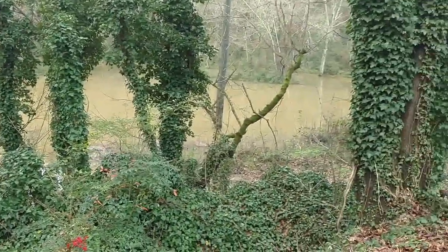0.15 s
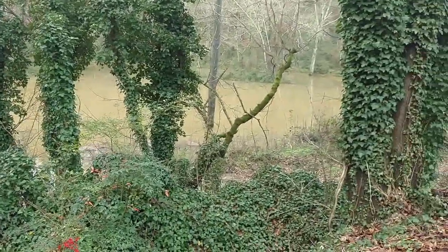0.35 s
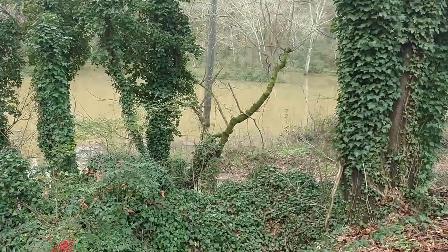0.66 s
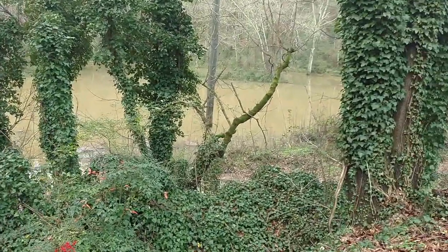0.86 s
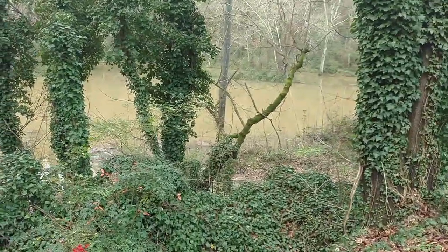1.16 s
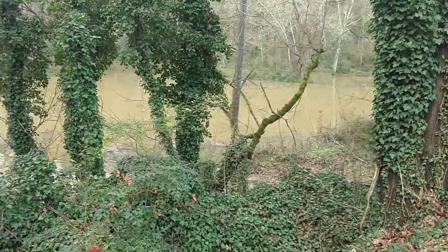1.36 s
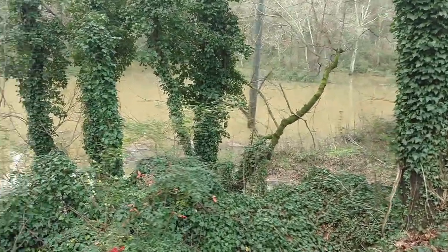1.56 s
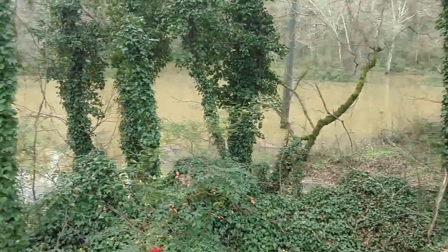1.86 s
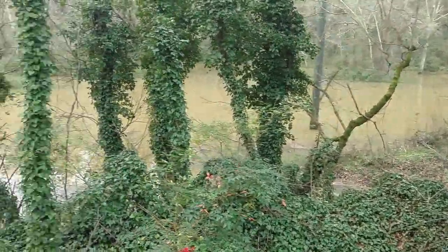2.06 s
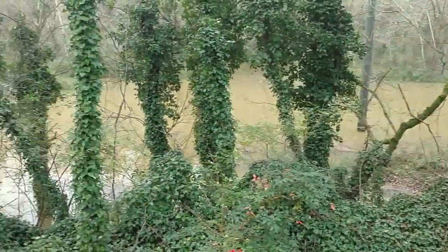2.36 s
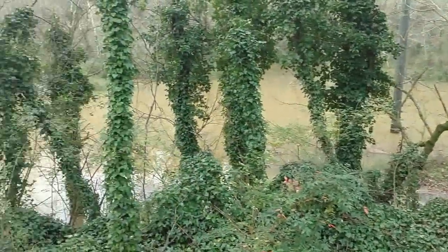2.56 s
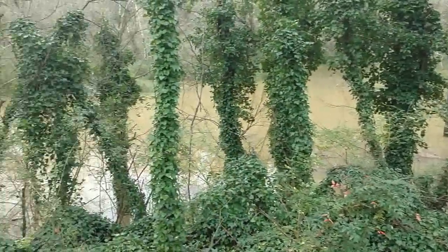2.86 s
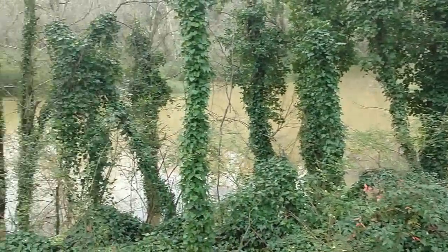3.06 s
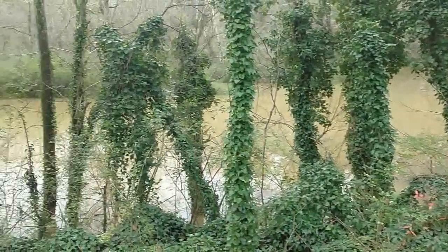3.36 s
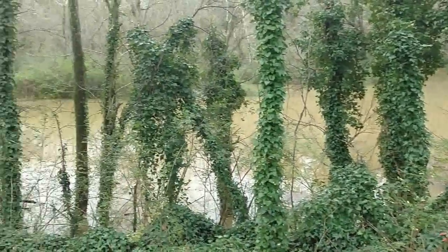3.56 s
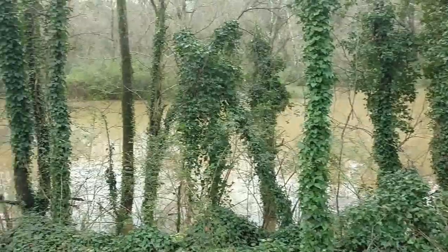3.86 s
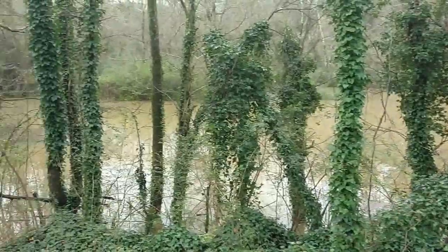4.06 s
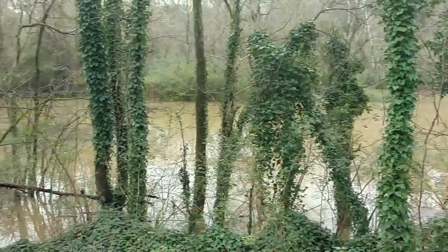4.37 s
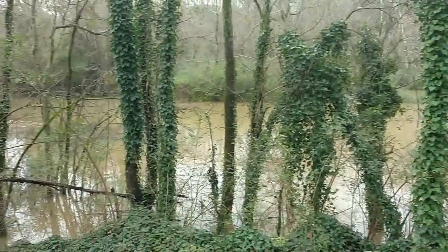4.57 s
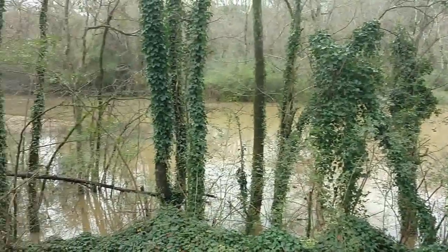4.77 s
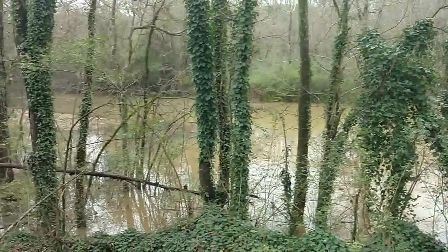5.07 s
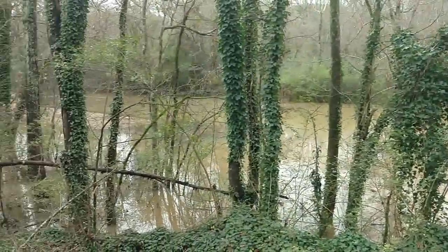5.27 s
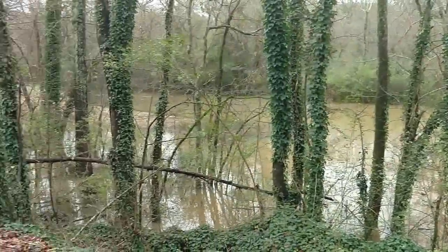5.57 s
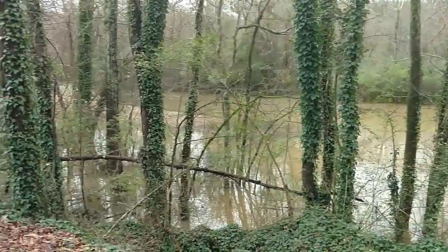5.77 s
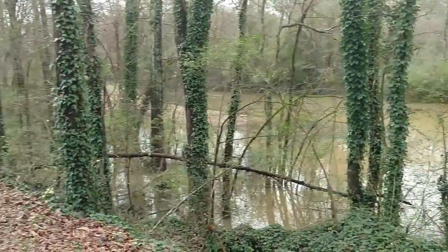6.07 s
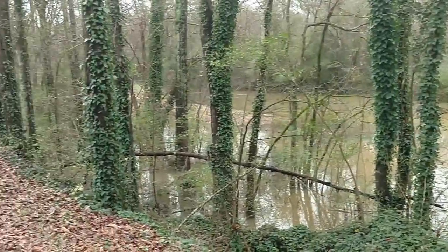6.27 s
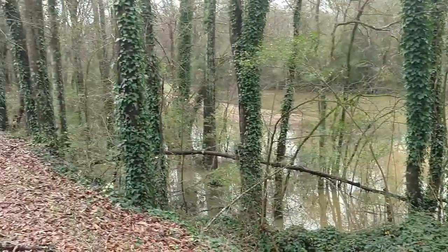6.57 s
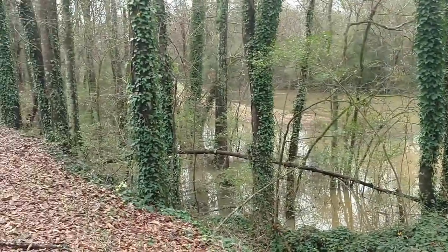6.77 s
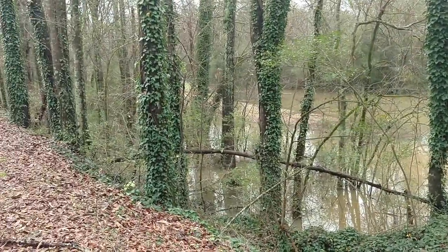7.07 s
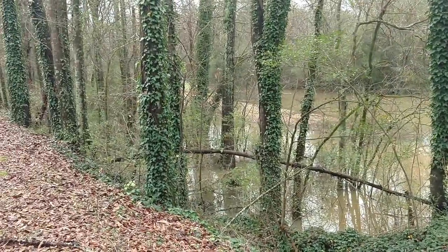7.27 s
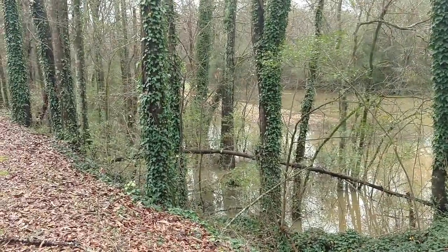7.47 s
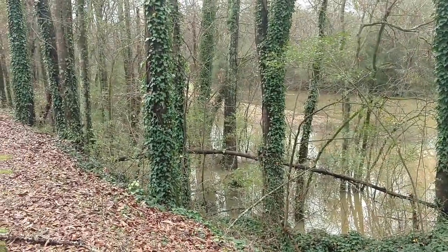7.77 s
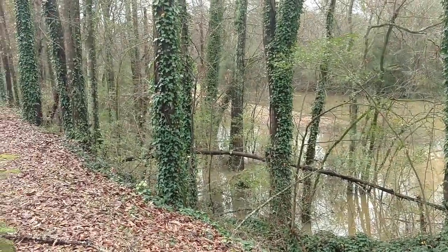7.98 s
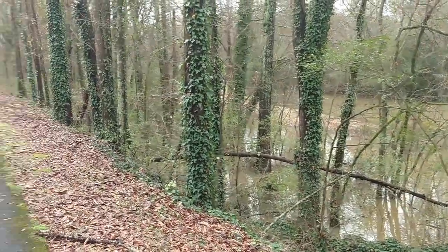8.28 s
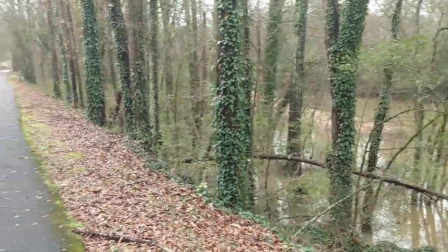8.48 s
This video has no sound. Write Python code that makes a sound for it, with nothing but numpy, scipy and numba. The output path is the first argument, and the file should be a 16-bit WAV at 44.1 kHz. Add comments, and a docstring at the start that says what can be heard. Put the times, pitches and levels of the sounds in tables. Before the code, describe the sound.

A handheld stereo microphone turns beside a wooded pond. Frogs fill the air with overlapping ratcheting trills, moderate at first, then stronger and closer, over a soft hum of far traffic. From about four seconds several raspy distant crow caws echo through the trees, a small bird whistles thinly, and soft handling clicks and a few duller bumps come very close.

```python
"""A flooded wood: chorus frogs trill, each call a slowing train of short tonal pulses that mostly rises in pitch.
Far crows caw by harmonics through throat resonances, and a small bird peeps in gliding whistles.
Distant traffic hums as filtered noise, and the hand ticks on the phone as damped tone blips.
The phone makes its stereo from two ports, each minus a delayed share of the other."""
import sys
import numpy as np
from scipy import signal
from scipy.fft import rfft, irfft, next_fast_len
from scipy.io import wavfile
from scipy.ndimage import uniform_filter1d
from numba import njit

SR = 44100
rng = np.random.default_rng(int(sys.argv[2]) if len(sys.argv) > 2 else 0)


def inscribe(sig):
    """Save sig as 16-bit PCM at rate SR to the path in sys.argv[1].

    A 1-D sig is mono; a 2-D sig holds one channel per row.
    Samples are clipped to [-1, 1] before scaling.
    """
    pcm = np.round(np.clip(np.atleast_2d(sig).T, -1, 1) * 32767)
    wavfile.write(sys.argv[1], SR, pcm.astype(np.int16))


N = 381024

# Spectra of air and far traffic at the ports: frequency_hz, shared_db_per_hz, opposed_db_per_hz
AIR_SPECTRA = [(30, -74.5, -95.5), (60.3, -70.5, -86), (109, -65, -84), (145, -66, -85), (183, -64, -83.5),
               (311, -77.5, -90), (560, -83, -93), (1100, -86.5, -88.5), (1620, -86, -79),
               (1950, -91.5, -85.5), (4900, -93, -99), (5850, -106, -104), (7350, -107, -110),
               (10100, -113, -114), (15200, -120, -121)]
# Swell of the traffic bass, used relative to its mean: time_s, level_db
TRAFFIC_SWELL = [(0.0, -53.5), (3.7, -51.5), (5.0, -49.5), (5.3, -52), (6.5, -49), (7.2, -54.5),
                 (8.64, -51.5)]
# Massed far frogs, relative levels: time_s, level_db, centre_pitch_hz, highest_voices_db
CHORUS_COURSE = [(0.0, -37, 3040, -7.5), (0.26, -40.5, 3040, -19), (1.25, -36.5, 3100, -19),
                 (1.61, -39.5, 3020, -7.5), (2.21, -37, 3050, -21.5), (2.48, -40.5, 3040, -5),
                 (2.79, -36.5, 2970, -17), (3.01, -32, 3035, -11.5), (3.2, -36, 3110, -12.5),
                 (3.46, -36.5, 2970, -20.5), (3.7, -34.5, 3100, -15.5), (4.06, -38, 2920, -8.5),
                 (4.21, -38, 3084, -11), (4.52, -35.5, 2998, -14.5), (4.88, -35.5, 3100, -11),
                 (5.22, -39, 3040, -22.5), (5.41, -34, 3100, -18.5), (5.87, -37.5, 2940, -5),
                 (6.04, -30.5, 3140, -19), (6.21, -34, 3130, -7.5), (6.47, -31, 2970, -24.5),
                 (6.74, -28, 3123, -18.5), (6.88, -36, 3115, -7), (7.12, -30.5, 2982, -22.5),
                 (7.51, -30.5, 3037, -9), (7.72, -36, 3100, -18.5), (7.92, -29.5, 3050, -22.5),
                 (8.11, -32, 3050, -13), (8.47, -30.5, 2990, -9.5), (8.64, -22.5, 3194, -31.5)]
# Partials of a frog pulse: multiple_of_pitch, level_db
FROG_PARTIALS = [(.5, -34), (1, 2), (1.5, -37), (2, -46)]
# The phone turns, shading its far port from the pond: time_s, left_port_level_db
PHONE_TURN = [(0, -2.5), (2.3, -2.5), (2.8, -3.5), (4, -2.5), (5.5, 6), (6.2, 1.5), (6.8, 0.5), (7.6, 1),
              (8.2, -2), (8.64, -1)]
# Bouts of small high frogs: start_s, length_s, first_hz, last_hz, relative_level_db
HIGH_FROG_BOUTS = [(0.0, 0.33, 3460, 3450, -43.5), (0.519, 0.47, 3280, 3790, -42.5),
                   (1.195, 0.34, 3450, 3530, -39.5), (2.199, 0.4, 3450, 3750, -43.5),
                   (4.097, 0.4, 3450, 3850, -44.5), (5.444, 0.37, 3450, 3760, -42),
                   (7.151, 0.53, 3430, 3780, -36)]
# Rhythm of the nearer frogs: start_s, pulses, first_gap_ms, gap_growth_ms_per_pulse, longest_gap_ms,
# closing_gap_ms
CALL_RHYTHMS = [(0.6585, 8.0, 33.4, 3.82, 53.1, 49.9), (2.0698, 12.0, 34.8, 2.29, 46.5, 44.9),
                (2.2912, 7.0, 37.5, 6.3, 54.6, 57.4), (2.3087, 7.0, 36.8, 2.66, 44.1, 44.5),
                (2.7279, 14.0, 33.2, 3.16, 51.5, 49.0), (2.7493, 13.0, 24.3, 2.68, 48.9, 47.8),
                (2.7677, 10.0, 44.4, 1.5, 51.2, 55.9), (3.0848, 7.0, 43.0, 1.89, 46.4, 52.4),
                (3.3943, 10.0, 26.3, 2.62, 45.4, 45.4), (3.470, 6.0, 46.0, 5.5, 57.0, 56.0),
                (3.7799, 13.0, 35.4, 1.87, 47.1, 47.4), (4.145, 7.0, 32.0, 4.09, 51.2, 53.4),
                (4.8586, 14.0, 23.8, 3.6, 48.4, 51.3), (5.2873, 8.0, 32.5, 4.19, 53.8, 61.9),
                (5.4675, 7.0, 33.0, 3.79, 41.8, 48.4), (5.7434, 11.0, 26.7, 3.45, 55.7, 54.9),
                (6.0014, 10.0, 27.1, 2.49, 44.4, 47.9), (6.0341, 5.0, 24.1, 5.05, 38.1, 36.9),
                (6.4503, 14.0, 38.1, 2.19, 57.8, 35.5), (6.6445, 6.0, 47.5, 1.0, 49.0, 49.2),
                (6.5505, 8.0, 48.3, 0.0, 48.3, 38.0), (6.6873, 6.0, 40.6, 6.15, 57.4, 55.2),
                (7.1642, 9.0, 33.3, 3.19, 55.3, 48.9), (7.3103, 12.0, 26.7, 3.61, 55.6, 40.4),
                (7.8436, 8.0, 36.4, 4.29, 55.9, 55.8), (7.9364, 12.0, 23.0, 2.59, 44.4, 37.4),
                (8.2685, 10.0, 26.4, 1.5, 34.0, 29.0), (8.4035, 5.0, 38.5, 5.0, 48.5, 51.0),
                (7.931, 6.0, 29.5, 8.0, 46.0, 60.0)]
# Row for row, their voices before scatter and limits: first_hz, last_hz, first_db, last_db,
# middle_swell_db, pulse_width_ms
CALL_VOICES = [(3100.0, 3060, -23, -31, 1.5, 5.1), (2810, 2980, -28, -26, 0.5, 7.4),
               (2920, 3070, -24, -22, 3, 4.3), (2820, 3080, -27, -25, 1.5, 4.7),
               (2880, 3120, -22, -24, 3.5, 3.7), (3420, 3640, -36, -33.5, 8.5, 2.9),
               (2900, 3220, -20, -22.5, 6.5, 2.6), (2730, 2800, -22, -24, 3, 3),
               (2840, 3280, -24.5, -24.5, 7, 3.3), (2860, 2900, -27, -31.5, 12.5, 2.6),
               (2780.0, 2990, -18.5, -21.5, 0, 2.9), (2800, 3020, -22, -18, -8, 6),
               (2970.0, 3220, -41, -20, 4, 4.2), (2640, 2850, -17.5, -12.5, -0.5, 1.7),
               (2970.0, 1700, -30, -23.5, 1.5, 2.7), (2800, 3120, -19, -7, 3.5, 3.6),
               (3570, 3740, -31, -25.5, 3.5, 3.6), (2970, 3190, -15.5, -11, 2, 2.1),
               (2960, 3090.0, -11.5, -23.5, 5.5, 2), (3450, 3750, -19.5, -31, 2.5, 4.6),
               (3040.0, 3280, -7.5, -15, -2, 4.9), (3020, 3100, -17, -15, 4.5, 4.9),
               (2920, 3244, -14.5, -10, 2.5, 3.3), (2770, 3137, -11.5, -8.5, 2, 3.6),
               (2940.0, 3110, -10, -18, 2.5, 4), (3460, 3720, -29, -21.5, 4.5, 3.3),
               (2730, 3140, -24, -14, 4, 3.5), (2920.0, 3100, -13, -12, 2.5, 3.6),
               (3050, 3240, -20, -15.5, 4, 4.2)]
# Finger ticks on the case, levels before each part's lift: time_s, click_db, knock_db, thump_db
FINGER_TICKS = [(0.68, -56, -58, -52), (1.149, -45, -55, -60), (3.0856, -62, -35, -30.5),
                (4.356, -36, -33, -61), (4.807, -39, -21.5, -38), (5.4194, -51, -53, -55),
                (6.1394, -44, -42, -62), (6.2572, -41, -40, -58), (6.2862, -48, -50, -54),
                (6.7103, -40, -46, -73), (7.623, -48, -59, -58), (7.678, -49, -58, -63),
                (7.733, -48, -56, -60), (8.2428, -39, -53, -55), (8.5705, -48, -46, -61)]
# Small-bird whistles: start_s, length_s, first_hz, middle_hz, last_hz, peak_db, octave_relative_db
BIRD_PEEPS = [(3.565, 0.38, 6680, 7140, 7130, -67, -42), (4.045, 0.082, 3750, 4000, 3800, -53.5, -32),
              (4.062, 0.17, 2780, 2460, 2380, -46, -16), (6.607, 0.054, 3900, 4160, 3800, -49.5, -16.5),
              (6.65, 0.15, 2600, 2530, 2340, -55, -34), (6.677, 0.12, 9030, 8350, 8150, -69.5, -40),
              (6.712, 0.057, 4750, 4820, 4700, -52, -36), (6.805, 0.082, 4650, 4320, 4370, -55, -45)]
# Crow caws, relative levels: start_s, length_s, crest_held_s, first_hz, crest_hz, lowest_hz,
# sag_hz_per_s, crest_db, tail_relative_db
CROW_CAWS = [(3.658, 0.27, 0.016, 509, 722.5, 477, 1397, -35, -12),
             (3.956, 0.25, 0.051, 695, 717, 700, 1200, -45, -6),
             (4.06, 0.494, 0.033, 525.4, 735, 508, 1623, -31.5, -12),
             (4.23, 0.16, 0.074, 758, 835, 745, 1190, -39, -4),
             (4.465, 0.29, 0.022, 589, 754, 560, 2198, -30.5, -16),
             (4.6, 0.3, 0.06, 656.6, 701, 633, 400, -41.5, -5),
             (4.737, 0.163, 0.032, 765, 834, 760, 900, -42.5, -3),
             (5.074, 0.32, 0.012, 540.6, 682, 524, 1525, -29, -12.5),
             (5.638, 0.32, 0.01, 515, 687.7, 453, 1350, -27, -14.5),
             (6.577, 0.38, 0.019, 563, 674, 540, 1193, -48.5, -10)]
# Resonances of the crow's throat: frequency_hz, width_hz, level_db
THROAT_RESONANCES = [(700, 280, -23.5), (1370, 347, -0.5), (1676, 260, -13), (1875, 166, -8.5),
                     (2130, 340, -15.5), (5170, 3400, -29)]
# Share of the opposite port that is subtracted: frequency_hz, share_0_to_1
PORT_SHARE = [(300, .92), (1250, .83), (2500, .68), (5200, .68), (7000, .88)]

BOUT_GAP_S, BOUT_WIDTH_MS = .011, 3.8  # median gap, pulse width
BOUT_SWELL_DB, BOUT_SCATTER_DB, BOUT_SCATTER_HZ = 2, 2, 80
LENGTHEN, CLOSING_DB = 0.61, -2.5  # last pulses of a call are longer, the closing one softer
SCATTER_DB, SCATTER_HZ = 1.3, 45  # no two pulses are alike
LOWEST_HZ = 2700  # floor of a near call's pitch, before scatter
PEAK_AT, PEEP_IN_DB, PEEP_OUT_DB = .42, -7.5, -11  # peak as share of length; levels of the ends
ONSET_DB, RISE_S, SINK_S = -21, .062, 0.079  # a caw's start below its crest, climb, sinking time constant
RELEASE_S, RELEASE_DB = 0.045, -3
RASP_HZ, RASP_SWING = 62, .5  # mean rate of throat pulsing; peak-to-peak swing at a caw's start
CLEAR, HOARSER = .6, 1.6  # a caw starts nearly clean and wavers more towards its end
PORT_LAG, TOP_HZ = 17.25, 15400  # samples; cutoff


def undb(db):
    """Decibels are logarithmic: 20 dB is a factor of ten in amplitude."""
    return 10 ** (np.asarray(db) / 20)


def curve(rows):
    """Linear interpolation joins a table's columns, one value per sample."""
    s, *cols = np.transpose(rows)
    return [np.interp(np.arange(N) / SR, s, c) for c in cols]


def shape(x, response):
    """Linear filtering: multiply the spectrum by a response given as a function of frequency."""
    size = next_fast_len(N + SR)
    hz = np.fft.rfftfreq(size, 1 / SR) + 1e-3
    return irfft(rfft(x, size) * response(hz), size)[..., :N]


def delay(x, lag):
    """A delay in samples is a phase shift proportional to frequency."""
    return shape(x, lambda hz: np.exp(-2j * np.pi * hz * lag / SR))


def walk(rate):
    """Low-pass randomness: levels held 1 / rate s and slewed twice, with a spread near 1."""
    k = int(SR / rate)
    held = np.repeat(rng.standard_normal(N // k + 1), k)
    return 1.3 * uniform_filter1d(uniform_filter1d(held, k), k)[:N]


def tail_noise(length, t60):
    """Diffuse reverberation: independent noise at each port decays 60 dB in t60 seconds."""
    t = np.arange(length) / SR
    return rng.standard_normal((2, length)) * np.exp(-np.log(1000) * t / t60)


def reverberate(x, tails):
    """Convolution spreads a source over its tails, scaled to unit energy at the first port."""
    return signal.fftconvolve(x[None], tails / np.sqrt(np.sum(tails[0] ** 2)), axes=1)[:, :N]


def place(x, left_db, left_lag, wet_db, t60):
    """Level and time differences between two ports; trunks scatter a separate tail to each."""
    tails = tail_noise(SR // 2, t60) * (np.arange(SR // 2) / SR > .006)
    direct = np.array([delay(x, left_lag), x])
    return (direct + undb(wet_db) * reverberate(x, tails)) * undb([[left_db], [0]])


@njit
def blips(n, sr, rows, partials, skew, glide):
    """Damped oscillation: tones (time_s, gain, pitch_hz, half-level width_s, phase) swell, die and may sag."""
    out = np.zeros(n)
    for t, gain, hz, width, phase in rows:
        centre, span = t * sr, int(2.5 * width * sr)
        for i in range(max(int(centre) - span // 2, 0), min(int(centre) + span, n)):
            u = (i - centre) / sr
            side = width * (skew if u < 0 else 1 - skew)
            envelope = gain * np.exp(-np.log(2.) * (u / side) ** 2)
            turn = 2 * np.pi * hz * u * (1 - glide * u / width) + phase
            for multiple, level in partials:
                out[i] += envelope * level * np.sin(multiple * turn)
    return out


def pulses(s, db, hz, ms, shortest_ms=2.3):
    """Resonator ringing: the vocal sac colours every pulse and never rings shorter than a few cycles."""
    phase = rng.random((len(s), 1)) * 4 * np.pi  # two turns, since one partial is at half pitch
    rows = np.column_stack([s, undb(db), hz, np.maximum(ms, shortest_ms) / 1000, phase])
    partials = np.array([(multiple, undb(level_db)) for multiple, level_db in FROG_PARTIALS])
    return blips(N, float(SR), rows, partials, .4, 0.041)


def phrase(rows):
    """Frequency modulation: samples, pitch and gain of one call, with rounded glides and soft ends."""
    s, hz, db = np.transpose(rows)
    at = np.arange(int(s[0] * SR), int(s[-1] * SR))
    t = at / SR
    ends = np.clip(np.minimum(t - s[0], s[-1] - t) / 0.0022, 0, 1)
    pitch = uniform_filter1d(np.interp(t, s, hz), SR // 50, mode="nearest")
    return at, pitch, undb(np.interp(t, s, db)) * ends


def air():
    """Band-filtered noise: octaves flicker alone; the bass swells with the traffic, which lies to the left."""
    hz, *parts = np.transpose(AIR_SPECTRA)

    def coloured(db):
        response = lambda f: undb(np.interp(np.log(f), np.log(hz), db, left=-140)) * np.sqrt(SR / 2)
        return shape(rng.standard_normal(N), response)

    pair = np.array([coloured(db) for db in parts])
    swell_db, out = curve(TRAFFIC_SWELL)[0], 0
    for centre in 32 * 2. ** np.arange(10):
        band = shape(pair, lambda f: np.cos(np.pi / 2 * np.clip(np.log2(f / centre), -1, 1)) ** 2)
        out = out + band * undb(walk(7) + (swell_db - swell_db.mean()) * (centre < 400))
    shared, opposed = out

    # only the engine drone keeps one direction at both ports
    def lead(f):
        return np.exp(2j * np.pi * f * 7.4 / SR / (1 + (f / 450) ** 2) / (1 + (110 / f) ** 4))

    return np.array([shape(shared, lead) + opposed, shared - opposed])


def chorus(count=90, beats=20):
    """Incoherent summation: many far frogs repeat slowing, rising calls; groups sit in different directions."""
    db, centre_hz, high_db = curve(CHORUS_COURSE)
    out, k = 0, np.arange(beats)
    for group_db, lag in [(-2, 0.34), (-2.5, 0.6), (-13.5, 1.8)]:
        rows = []
        # voices spread from low to high; the extreme ones are softer
        spread = np.linspace(-1.3, 3.2, count // 3)
        for pitch, (size, tempo, start) in zip(spread, rng.standard_normal((count // 3, 3))):
            gaps = .021 * (1 + .1 * tempo) * 1.045 ** k
            period = gaps.sum() + .45
            for t0 in np.arange(-period * (abs(start) * 7 % 1), N / SR, period):
                s = t0 + np.cumsum(gaps)
                voice_db = 0.26 * size - 2.2 * pitch ** 2 + 7 * np.sqrt(k / beats)
                ratio = 0.9494 + .07 * pitch + 0.043 * (k / beats - .5)
                rows.append([s, voice_db, ratio, 3.46 + 0.14 * k / beats])
        s, gain_db, ratio, ms = np.concatenate(rows, axis=1)
        at = np.clip((s * SR).astype(int), 0, N - 1)
        hz = ratio * centre_hz[at]
        # the small high-voiced frogs join in and drop out together
        gain_db += 1.7 * (high_db[at] - high_db.mean()) * np.clip((ratio - 1.04) / 0.18, 0, 1)
        # the deepest voices drop out while the crowd's pitch is high
        gain_db -= 0.064 * (centre_hz[at] - centre_hz.mean()) * np.clip((.94 - ratio) / 0.045, 0, 1)
        out = out + place(pulses(s, gain_db, hz, ms), group_db, lag, -0.5, 0.55)
    # the crowd as a whole follows its level curve; its loudness flickers irregularly
    running_rms = np.sqrt(uniform_filter1d(out[1] ** 2, SR // 4))
    return out / running_rms * undb(db + 3.0 + 0.95 * walk(25))


def bouts():
    """Temporal fusion: overlapping trills blur into a dense patter that swells while its pitch glides."""
    rows = []
    for t0, length, hz0, hz1, db in HIGH_FROG_BOUTS:
        chance = rng.standard_normal((80, 3)).T
        s = np.cumsum(BOUT_GAP_S * np.exp(.5 * chance[0]))
        u = s / length
        level_db = db + BOUT_SWELL_DB * np.sin(.8 * np.pi * u) + BOUT_SCATTER_DB * chance[1]
        hz = hz0 + (hz1 - hz0) * u + BOUT_SCATTER_HZ * chance[2]
        rows.append(np.array([t0 + s, level_db, hz, BOUT_WIDTH_MS + 0 * s])[:, u < 1])
    return rows


def frogs():
    """Pulse-train rhythm: gaps grow to a limit, pitch glides with slight scatter, level arches mid-call."""
    rows = []
    for rhythm, voice in zip(CALL_RHYTHMS, CALL_VOICES):
        t0, count, gap_ms, growth_ms, top_ms, closing_ms = rhythm
        hz0, hz1, db0, db1, arch_db, ms = voice
        k = np.arange(round(count))
        gaps = np.minimum(gap_ms + growth_ms * k[:-1], top_ms)
        gaps[-1] = closing_ms
        u, chance = k / k[-1], rng.standard_normal((20, 2))[k].T
        s = t0 + np.r_[0, np.cumsum(gaps)] / 1000
        # the level swells or dips mid-call
        db = db0 + (db1 - db0) * u + arch_db * np.sin(np.pi * u)
        db = db + CLOSING_DB * (u == 1) + SCATTER_DB * chance[0]
        hz = np.maximum(hz0 + (hz1 - hz0) * u, LOWEST_HZ) + SCATTER_HZ * chance[1]
        rows.append([s, db, hz, ms * (1 + LENGTHEN * u ** 4)])
    calls = pulses(*np.concatenate(rows + bouts(), axis=1))
    return undb(-5.0) * place(calls, -8.5, 0.85, -6.0, 0.91)


def ticks(rattle_db=-3, rattle_s=.04):
    """Impact excitation: a click that rattles briefly, a short knock and a thump of the case."""
    s, *levels = np.transpose(FINGER_TICKS)
    one = np.array([(1., 0.9)])  # a single partial
    parts = [(6068, 0.000098, 0.5), (492, 0.00024, 1.6), (90.2, 0.0076, 4.1)]  # pitch_hz, width_s, lift_db

    def struck(hz, width, db):
        rows = np.column_stack([s + .002, undb(db), hz + 0 * s, width + 0 * s, 1.476 + 0 * s])
        return blips(N, float(SR), rows, one, 0.18, 0.)

    click, knock, thump = (struck(hz, w, db + lift_db) for (hz, w, lift_db), db in zip(parts, levels))
    rattle = reverberate(click, tail_noise(SR // 10, rattle_s))
    x = click + knock + thump
    return np.array([undb(8.5) * delay(x, 7.4), x]) + undb(rattle_db) * rattle


def peep(t0, length, first_hz, middle_hz, last_hz, peak_db):
    """Pitch glide under an envelope: a whistle swells to its middle note and fades."""
    return [(t0, first_hz, peak_db + PEEP_IN_DB), (t0 + PEAK_AT * length, middle_hz, peak_db),
            (t0 + length, last_hz, peak_db + PEEP_OUT_DB)]


def bird():
    """Near-sinusoidal whistling: thin, slightly hoarse notes with an octave of varying strength."""
    out, hoarse = np.zeros(N), walk(160)
    for *row, octave_db in BIRD_PEEPS:
        at, hz, gain = phrase(peep(*row))
        phase = 2 * np.pi * np.cumsum(hz * (1 + .012 * hoarse[at])) / SR
        tone = np.sin(phase) + undb(octave_db) * np.sin(2 * phase)
        out[at] += gain * (1 + .35 * hoarse[at + 900]) * tone  # level wavers apart from pitch
    return place(out, 8.0, 1.7, -3, 0.25)


def caw(t0, length, held, first_hz, crest_hz, low_hz, sag_hz_per_s, crest_db, tail_db):
    """Pitch contour: pitch and level climb to a crest; pitch then sags steadily, level sinks to a tail."""
    u = np.linspace(0, length, num=40)
    climb = np.sin(np.pi / 2 * np.clip(u / RISE_S, 0, 1))
    after = np.maximum(u - RISE_S - held, 0)
    hz = first_hz + (crest_hz - first_hz) * climb - np.minimum(sag_hz_per_s * after, crest_hz - low_hz)
    onset_db = ONSET_DB * np.clip(1 - u / RISE_S, 0, 1) ** 2
    sink_db = tail_db * (1 - np.exp(-after / SINK_S))
    release_db = RELEASE_DB * np.clip(1 - (length - u) / RELEASE_S, 0, 1)
    return np.column_stack([t0 + u, hz, crest_db + onset_db + sink_db + release_db])


def throat(hz):
    """Formant resonance: the throat's gain is a sum of peaks over frequency."""
    return sum(undb(db) / (1 + (2 * (hz - f) / width) ** 4) for f, width, db in THROAT_RESONANCES)


def crows(rough=0.4, echo_s=.17, echo_db=-14, breath_db=-10):
    """Source and filter: throat-weighted harmonics, harsh with fast flutter; the far bank answers."""
    out, effort = np.zeros(N), np.zeros(N)
    waver, flutter = 1 + .02 * walk(170), rough * walk(200)
    # the throat pulses at a slightly unsteady rate
    rasp = np.sin(2 * np.pi * np.cumsum(RASP_HZ * (1 + 0.17 * walk(30))) / SR)
    flutter = flutter + RASP_SWING / CLEAR * rasp / 2
    for row in CROW_CAWS:
        at, hz, gain = phrase(caw(*row))
        hoarseness = np.linspace(CLEAR, 1 + HOARSER, num=len(at))
        phase = 2 * np.pi * np.cumsum(hz * waver[at] ** hoarseness) / SR
        weights = [throat(k * hz) for k in range(1, 12)]
        tone = sum(a * np.sin(k * phase) for k, a in enumerate(weights, 1))
        tone = tone / np.sqrt(sum(a ** 2 for a in weights) / 2)
        out[at] += gain * tone * (1 + flutter[at] * np.linspace(CLEAR, 1, num=len(at)))
        effort[at] += gain
    # air rushes through the same throat
    air_rush = shape(rng.standard_normal(N), throat)
    out = out + undb(breath_db) * effort * air_rush / air_rush.std()
    out = out + undb(echo_db) * delay(out, echo_s * SR)
    return undb(-3.0) * place(out, -6.5, -3.5, -3, 1.0)


def scene():
    """Superposition: pressures of all sources add at the ports; the turning phone shades the pond."""
    pond = chorus() + frogs()
    pond[0] *= undb(curve(PHONE_TURN)[0])
    return air() + pond + ticks() + bird() + crows()


def record(dry):
    """Pressure-gradient stereo: each port minus a delayed share of the other; then the top is cut."""
    hz, share = np.transpose(PORT_SHARE)

    def leak(f):
        return np.interp(np.log(f), np.log(hz), share) * np.exp(-2j * np.pi * f * PORT_LAG / SR)

    top_cut = signal.ellip(10, .2, 70, TOP_HZ, fs=SR, output="sos")
    return signal.sosfilt(top_cut, dry - shape(dry[::-1], leak))


dry = scene()
out = record(dry)
inscribe(out)
```